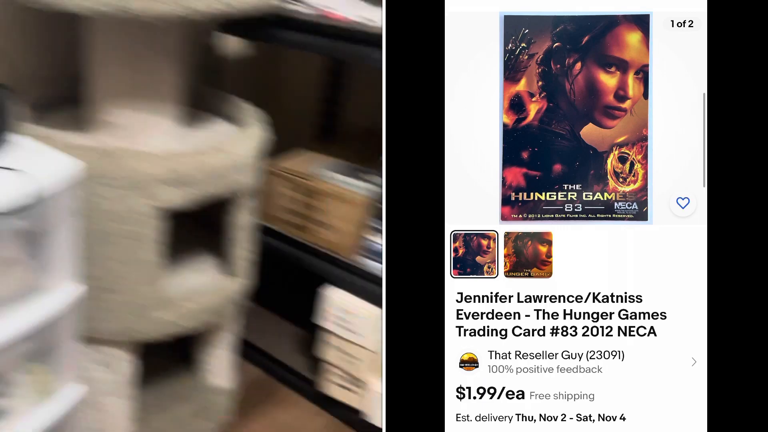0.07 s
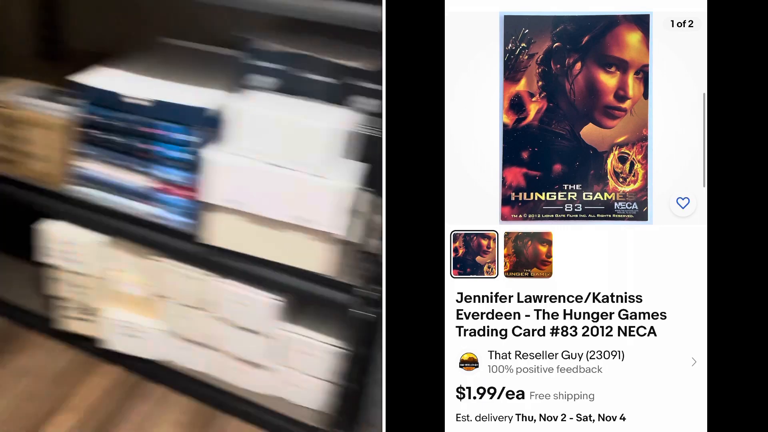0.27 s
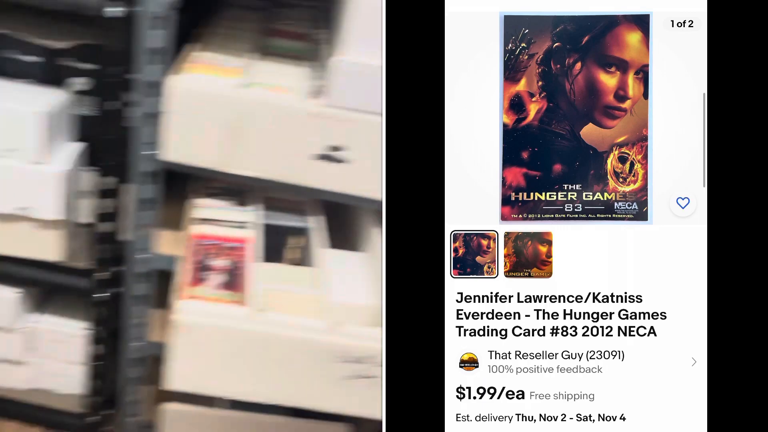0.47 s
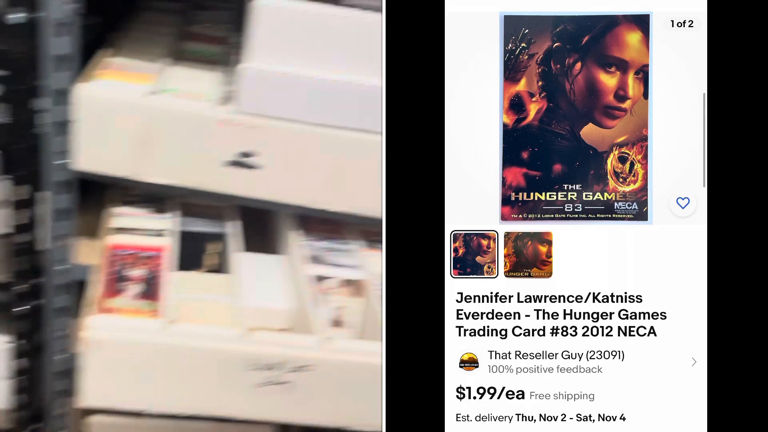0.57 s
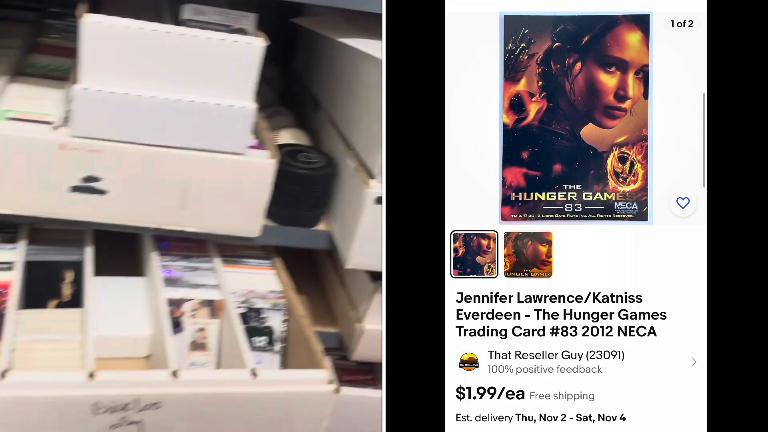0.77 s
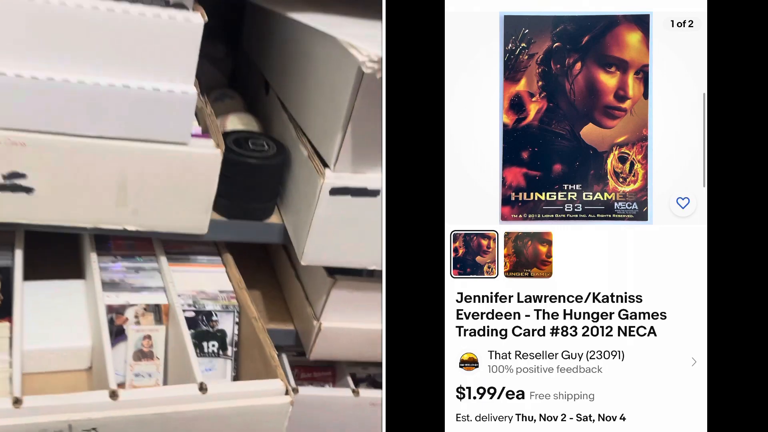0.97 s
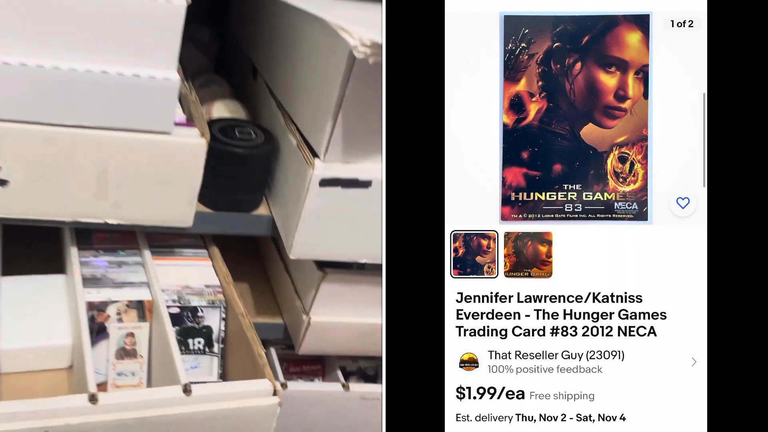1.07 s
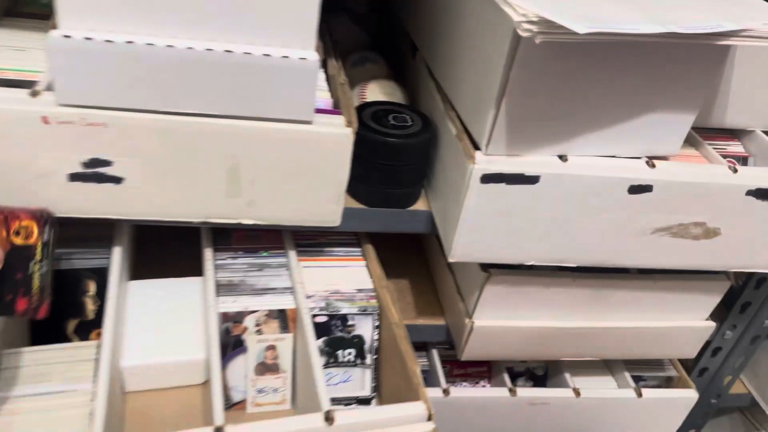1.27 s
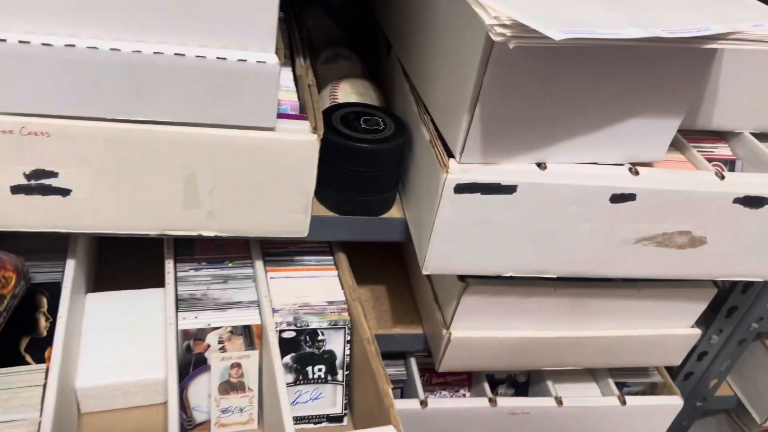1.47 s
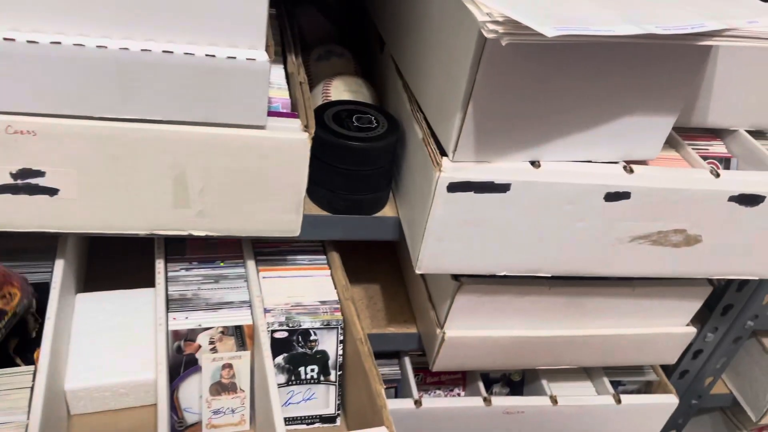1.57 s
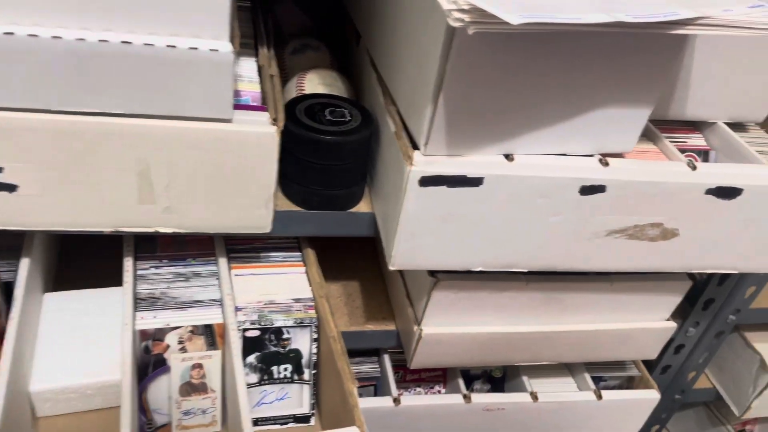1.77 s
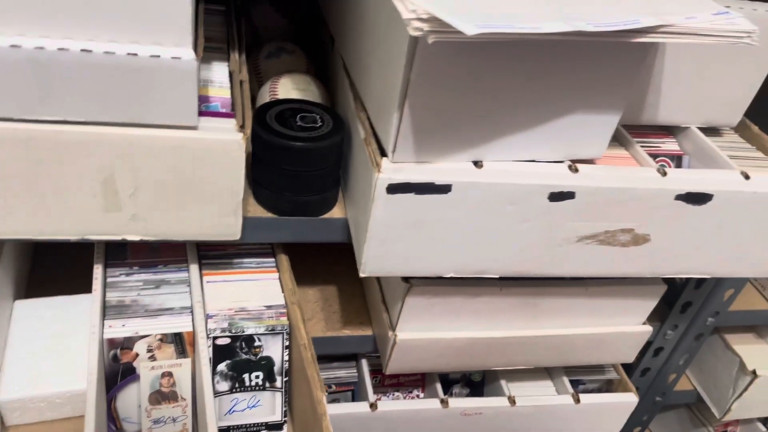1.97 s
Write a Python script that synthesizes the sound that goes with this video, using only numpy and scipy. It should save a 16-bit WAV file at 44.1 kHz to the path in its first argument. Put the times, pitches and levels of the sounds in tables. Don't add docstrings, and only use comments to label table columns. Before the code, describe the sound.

Chair casters rumble, bump and scrape across hard floor before a cardboard box lid knocks loudly

```python
import sys
import numpy as np
from scipy import signal
from scipy.fft import rfft, irfft, next_fast_len
from scipy.io import wavfile
from scipy.ndimage import map_coordinates

SR = 44100
rng = np.random.default_rng(int(sys.argv[2]) if len(sys.argv) > 2 else 0)


def to_wav(sig):
    pcm = np.clip(np.atleast_2d(sig), -1, 1) * 32767
    pcm = np.round(pcm).astype(np.int16)
    wavfile.write(sys.argv[1], SR, pcm.T)


def attenuation_scalar(level_db):
    decades = np.asarray(level_db, float) / 20
    return 10 ** decades


N = 88640


def unit(x):
    return x / np.sqrt(np.mean(x ** 2) + 1e-20)


def along(points, hz):
    f, v = np.transpose(points)
    return np.interp(np.log(hz + 1), np.log(f + 1), v, left=v[0] - 30 * (v[0] < 0))


def curves(rows):
    s, *cols = np.transpose(rows)
    return [np.interp(np.arange(N) / SR, s, c, left=-120, right=-120) for c in cols]


def wobble(rate):
    knots = rng.standard_normal(int(N * rate / SR) + 4)
    return map_coordinates(knots, [np.arange(N) * rate / SR])


def filtered(x, response):
    m = next_fast_len(N + SR // 2)
    return irfft(rfft(x, m) * response(np.fft.rfftfreq(m, 1 / SR)), m)[..., :N]


def body(peaks):
    def response(f):
        total = 0
        for k, (c, w, db) in enumerate(peaks):
            total = total + (-1) ** k * attenuation_scalar(db) * 1j * f * w / (c * c - f * f + 1j * f * w)
        return total
    return response


def grit(spread_db, rate):
    return unit(rng.standard_normal(N) * attenuation_scalar(spread_db * wobble(rate)))


def coloured(x, points):
    return unit(filtered(x, lambda hz: attenuation_scalar(along(points, hz))))


def swells(rows):
    t = np.arange(N) / SR
    return sum(attenuation_scalar(db) * np.exp(-.5 * ((t - s) / w) ** 2) for s, w, db in rows)


def casters():
    # start_s, level_db
    roll = [(0.0, -78.5), (0.236, -58.5), (0.36, -30.5), (0.56, -35.5), (0.574, -36), (0.644, -32.5),
            (0.88, -44), (0.908, -33.5), (0.962, -43.5), (1.136, -40.5), (1.186, -45.5), (1.214, -39),
            (1.288, -49), (1.306, -39), (1.342, -49.5), (1.64, -53.5)]
    level_db, = curves([*roll, (2.01, -62)])
    return rolling(level_db) + bumps(level_db) + jolts()


def rolling(level_db):
    # pitch_hz, level_db
    rumble = [(18, -53), (30, -47), (87, 0.5), (244, -11.5), (317, -2), (1380, -31.5), (1500, -29),
              (1950, -59), (3300, -120)]
    # pitch_hz, width_hz, level_db
    base_modes = [(177, 123, -4), (314, 31, -15), (484, 56, -5.5), (629, 181, -6), (888, 36, 0),
                  (1010, 615, -11.5), (2140, 820, -20)]
    floor_gain = attenuation_scalar(0.64 * (level_db + 50.5) - 49 + 3.2 * wobble(14.26))
    floor = floor_gain * coloured(grit(2.6, 39.9), rumble)
    base_gain = attenuation_scalar(level_db + 2.0 + 1.73 * wobble(20.93))
    return floor + base_gain * unit(filtered(grit(2.34, 90.19), body(base_modes)))


def bumps(level_db):
    # start_s, peak_db, brightness_db, pitch_hz, contact_s
    joints = [(0.307, -34, -8, 453.7, 0.022), (0.345, -19.5, -9, 479, 0.009),
              (0.414, -23, -6, 487.8, 0.014), (0.494, -22.5, -2, 481.3, 0.015),
              (0.522, -27, 12, 471, 0.011), (0.547, -27, -10, 482.3, .015), (0.572, -28, 1, 480.4, 0.022),
              (0.611, -21, -4, 485.4, 0.019), (0.643, -22.5, 4, 484, 0.018), (0.683, -22, 0, 447, .018),
              (.706, -26, -14, 480.3, .015), (0.724, -23, -29, 484, 0.021),
              (0.755, -28.5, -6, 483.6, 0.013), (0.79, -33, -21, 478.8, 0.0092),
              (0.823, -33.5, -20, 485.9, .015), (0.853, -32, -16, 484, .012), (0.881, -37.5, -29, 484, .01),
              (0.893, -23.5, -10, 484, 0.008), (0.903, -27, -2, 478.5, 0.015),
              (1.006, -38, -3, 486.3, 0.012), (1.033, -35, -13, 481.2, .02), (1.07, -31, -27, 472, .018),
              (1.107, -26.5, -28, 466, 0.015), (1.143, -32.5, -20, 484, .012), (1.179, -36, -22, 484, .012),
              (1.209, -29.5, -3, 460.4, 0.0068), (1.226, -25, -10, 484, 0.011),
              (1.249, -34, -12, 486, 0.014), (1.3, -25, -17, 469, 0.0096), (1.332, -39, 2.5, 452.3, .01),
              (1.392, -32, -9, 470.6, 0.0095), (1.414, -34.5, -0.5, 465, 0.017)]
    # pitch_hz, width_hz, level_db
    hub = [(930, 190, 2.5), (1710, 280, 4.5), (2090, 280, 4.5), (3270, 1400, -14.5)]
    hum_db, swell_db, ring_t60_s = -3, -1.5, .066
    swell = attenuation_scalar(level_db + hum_db + 1.4 * wobble(45.3))
    swell[round(1.47 * SR):] *= .2
    rattle, t = np.zeros(N), np.arange(SR // 8) / SR
    for s, db, bright_db, _, hold_s in joints:
        now = slice(round(s * SR), round(s * SR) + len(t))
        contact = attenuation_scalar(-60 * np.maximum(t - hold_s, 0) / ring_t60_s) * (1 - np.exp(-t / 0.0022))
        swell[now] = np.hypot(swell[now], attenuation_scalar(db + swell_db) * contact)
        rattle[now] += attenuation_scalar(db + bright_db + 2.0 - 60 * t / 0.15) * rng.standard_normal(len(t))
    hz = np.interp(np.arange(N) / SR - .012, *np.transpose(joints)[[0, 3]]) + 9 * wobble(70)
    hum = swell * np.sin(2 * np.pi * np.cumsum(hz) / SR)
    return hum + filtered(rattle, body(hub))


def jolts():
    # start_s, level_db, pitch_hz, t60_s
    jolt_rows = [(.326, -30, 110, .08), (0.348, -15.5, 146, 0.077), (0.35, -9, 232, 0.019),
                 (0.375, -28, 130, .06), (0.382, -15, 210, 0.032), (0.479, -29, 111, .09),
                 (0.611, -27, 110, 0.099), (.64, -22, 165, 0.095), (.69, -41, 101, 0.071),
                 (0.771, -28.5, 114, 0.11), (0.836, -27, 111, 0.081), (.915, -28, 107, 0.14),
                 (.995, -35, 135, .08), (1.1, -30, 104.9, 0.097), (1.14, -29, 115, 0.054),
                 (1.24, -30, 112, 0.16), (1.299, -26, 113, 0.065), (1.4, -29.5, 94.8, 0.13),
                 (1.53, -35, 90, 0.14)]
    thuds, t = np.zeros(N), np.arange(SR // 8) / SR
    for s, db, hz, t60 in jolt_rows:
        decay = attenuation_scalar(db - 60 * t / t60) * (1 - np.exp(-t / 0.0033))
        thuds[round(s * SR):][:len(t)] -= decay * np.sin(2 * np.pi * hz * t)
    return thuds


def scrape():
    # start_s, level_db, brightness_db
    drag = [
        (.3, -47, 1),
        (.35, -40.5, 7),
        (.389, -30, -7),
        (.395, -24.5, 3.5),
        (.47, -25.5, 2.5),
        (.54, -33, 1),
        (.68, -26, -5),
        (.74, -47, 8),
        (.9, -49, 3),
    ]
    # pitch_hz, width_hz, level_db
    fork = [(1473, 230, -4), (1880, 260, -1), (2600, 240, -6), (2990, 120, -9.5), (3350, 230, -7.5),
            (4950, 380, -20)]
    level_db, bright_db = curves(drag)
    ring = unit(filtered(grit(2.0, 350), body(fork)))
    edge_points = [(900, 5.5), (2000, 2.5), (4000, 0.5), (6000, -7.0), (8000, -34), (16000, -51)]
    edge = coloured(grit(1, 500), edge_points)
    return attenuation_scalar(level_db + 0.72 * wobble(36.0)) * (attenuation_scalar(-5.5) * ring + attenuation_scalar(bright_db - 8.5) * edge)


def glints():
    # start_s, length_s, level_db, pitch_hz
    songs = [(0.356, 0.036, -35, 945), (0.389, 0.019, -34.5, 2030), (0.387, 0.025, -35.5, 3380),
             (0.436, .025, -35.5, 3000), (0.423, 0.085, -36, 1460), (0.459, 0.021, -35, 1740),
             (0.496, 0.036, -44, 3230), (.553, 0.023, -33, 2600), (0.554, .08, -37.5, 1900),
             (0.569, 0.034, -46, 2500), (0.651, 0.019, -38.5, 2480), (0.67, 0.025, -34.5, 1704),
             (0.659, 0.052, -43.5, 3320), (.42, .3, -41, 905), (0.907, 0.028, -38.5, 1940),
             (0.913, 0.026, -41.5, 1610), (0.908, 0.036, -37.5, 886), (1.211, .012, -44, 2080),
             (1.322, 0.022, -51, 1299), (1.746, 0.021, -42.5, 2900), (1.851, .04, -42.5, 1290),
             (1.9305, .006, -13, 1880)]
    q, fade_s = 23, .008
    out, t = np.zeros(N), np.arange(N) / SR
    for s, w, db, hz in songs:
        start = (t > s) * (1 - np.exp(-np.abs(t - s) / 0.0014))
        held = start * np.exp(-np.maximum(t - s - w, 0) / fade_s)
        song = held * filtered(rng.standard_normal(N), body([(hz, hz / q, 0)]))
        out += attenuation_scalar(db) * song * np.linalg.norm(held) / np.linalg.norm(song)
    return out


def knock():
    # start_s, strength_db, brightness_db, low_modes_db
    blows = [
        (1.9083, 1.5, -8, 5),
        (1.9139, -3, -3.5, -7),
        (1.921, -0.5, -1.5, 1),
        (1.9305, 1, -0.6, 2.5),
        (1.9337, -2.5, 6.5, -10),
        (1.936, -5.5, -9, 5),
        (1.9443, -8.5, -1, 0),
        (1.948, -9.5, -0.5, 5),
        (1.956, -15, -3, 5),
    ]
    # pitch_hz, level_db, t60_s
    box = [(245, -6.5, 0.053), (304.5, -1, 0.049), (356, -3, 0.034), (484, -3, 0.036), (584, 1, 0.055),
           (659, -2, 0.046), (791, -3.5, 0.043), (1100, -3, 0.048), (1197, -21, 0.03), (1350, -2, 0.028),
           (1570, -16, 0.021), (1880, -2, 0.031), (2100, -2, 0.033), (2800, -4, 0.03)]
    # pitch_hz, level_db
    walls = [(120, -48), (230, -1), (560, -5.5), (714, -10.5), (1230, 0), (1510, -5), (5000, -21),
             (15000, -63)]
    slap_s, slap_hz, slap_hold_s, slap_db = 1.9352, 1215, .005, 2
    box_cut_hz = 98
    ring, snaps, t = np.zeros(N + SR), np.zeros(N + SR), np.arange(SR // 5) / SR
    for s, db, bright_db, low_db in blows:
        now = slice(round(s * SR), round(s * SR) + len(t))
        modes = np.zeros(len(t))
        for hz, level, t60 in box:
            v = rng.standard_normal()
            mode_db = level + low_db * (hz < 700) + 2.5 * v
            tone = np.sin(2 * np.pi * hz * (1 + 0.0085 * v) * t)
            modes += attenuation_scalar(mode_db - 60 * t / min(t60, .09)) * tone
        ring[now] += attenuation_scalar(db - 13) * modes * (1 - np.exp(-t / 0.0014)) ** 2
        crack = attenuation_scalar(-60 * t / 0.022) + 0.27 * attenuation_scalar(-60 * t / 0.17)
        snaps[now] += attenuation_scalar(db + bright_db) * crack * rng.standard_normal(len(t))
    slap = attenuation_scalar(slap_db - 60 * np.maximum(t - slap_hold_s, 0) / .008) * np.sin(2 * np.pi * slap_hz * t)
    ring[round(slap_s * SR):][:len(t)] += slap
    thin = filtered(ring[:N], lambda f: (1j * f / (box_cut_hz + 1j * f)) ** 2)
    return thin + attenuation_scalar(9.5) * filtered(snaps[:N], lambda hz: attenuation_scalar(along(walls, hz)))


def lid():
    # start_s, level_db
    slide = [
        (1.66, -70),
        (1.667, -57),
        (1.686, -44),
        (1.742, -41),
        (1.752, -36),
        (1.784, -41.5),
        (1.9, -35.5),
    ]
    # pitch_hz, level_db
    card = [(120, -31), (200, -4), (494, -1.5), (540, -18), (963, -3.5), (1050, -5.5), (4160, -7.5),
            (15000, -32.5)]
    # start_s, level_db, t60_s, colour_hz
    catches = [
        (1.685, -35.5, 0.053, 1270),
        (1.746, -37, 0.043, 2600),
        (1.75, -30.5, 0.048, 397),
        (1.848, -35, 0.097, 1340),
    ]
    s, db = np.transpose(slide)
    stroke_s, stroke_db = [*s, s[-1] + .02, s[-1] + .04], [*db, db[-1], -90]
    sliding_db = np.interp(np.arange(N) / SR, stroke_s, stroke_db, left=-90)
    out, t = attenuation_scalar(sliding_db) * coloured(grit(2.0, 230), card), np.arange(SR // 10) / SR
    for at, db, t60, hz in catches:
        band = signal.butter(2, [.7 * hz, 1.4 * hz], "bandpass", fs=SR, output="sos")
        burst = unit(signal.sosfilt(band, rng.standard_normal(len(t))))
        out[round(at * SR):][:len(t)] += burst * attenuation_scalar(db - 60 * t / t60)
    return out


def ticks():
    # middle_s, peak_db, pitch_hz, length_ms
    tick_rows = [
        (1.7, -23, 6200, .12),
        (1.7, -29, 8200, .25),
        (1.7, -40, 15300, .3),
        (1.625, -48, 7800, .3),
    ]
    out, t = np.zeros(N), np.arange(N) / SR
    for s, db, hz, ms in tick_rows:
        bell = np.exp(-.5 * (1000 * (t - s) / ms) ** 2)
        out += attenuation_scalar(db) * bell * np.cos(2 * np.pi * hz * (t - s))
    return out


def cloth():
    # middle_s, length_s, level_db
    rustles = [
        (.09, 0.013, -52),
        (.2, 0.19, -54.5),
        (.9, 0.27, -48.5),
        (1.05, 0.0073, -54),
        (1.25, 0.039, -60),
        (1.5, 0.095, -50.5),
    ]
    # pitch_hz, level_db
    fabric = [(700, -2), (1800, -1), (4200, -1), (6000, -4.5), (9000, -14.5), (15000, -21)]
    return swells(rustles) * coloured(grit(2.6, 300), fabric)


def bearing():
    # middle_s, length_s, level_db
    squeaks = [
        (.93, 0.19, -57),
        (1.35, 0.069, -69),
        (1.56, 0.078, -60.5),
    ]
    peak = body([(10000, 1800, 0)])
    return swells(squeaks) * unit(filtered(grit(1.5, 60), lambda f: peak(f) ** 2))


def room(x):
    # pitch_hz, t60_s
    decay = [(150, 0.24), (1000, 0.16), (4000, 0.41), (10000, 0.16)]
    hz, t, z = signal.stft(rng.standard_normal(SR // 2), SR, nperseg=256)
    t60 = np.interp(hz, *np.transpose(decay))[:, None]
    tail = signal.istft(z * attenuation_scalar(-60 * t / t60), SR, nperseg=256)[1]
    return signal.fftconvolve(np.pad(x, (200, 0)), tail / np.linalg.norm(tail))[:N]


def room_air():
    # pitch_hz, level_db
    air = [(15, -39), (25, 0), (144, 5.5), (1700, -11), (1900, -3.5), (2480, -7.5), (5280, -1.5),
           (6200, -7.5), (15500, -18)]
    return attenuation_scalar(-52 + 1.4 * wobble(4.43)) * coloured(rng.standard_normal(N), air)


def scene():
    near = casters() + scrape() + glints() + knock() + lid() + cloth() + bearing()
    room_db = -8.5
    return (near + attenuation_scalar(room_db) * room(near) + ticks() + room_air())[None]


def roll_off(x):
    return signal.sosfilt(signal.butter(12, 15620, fs=SR, output="sos"), x)


def record(dry):
    low_cut_hz = 53
    x = filtered(dry, lambda f: (1j * f / (low_cut_hz + 1j * f)) ** 2)
    mix = np.clip(x, -1, 1)
    return roll_off(mix)


dry = scene()
out = record(dry)
to_wav(out)
```